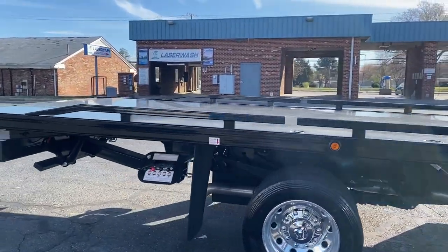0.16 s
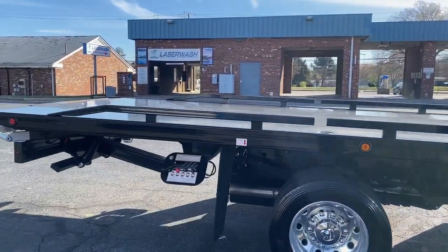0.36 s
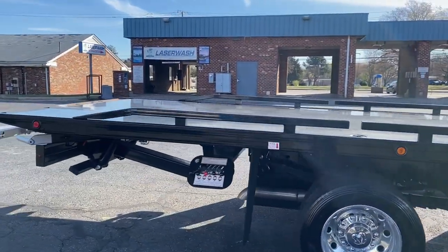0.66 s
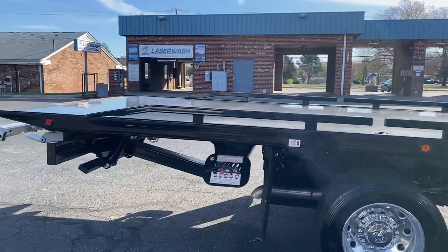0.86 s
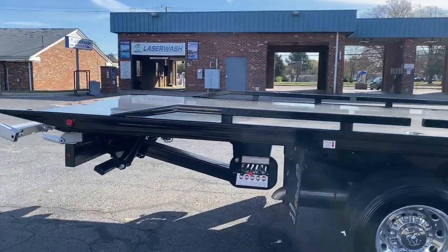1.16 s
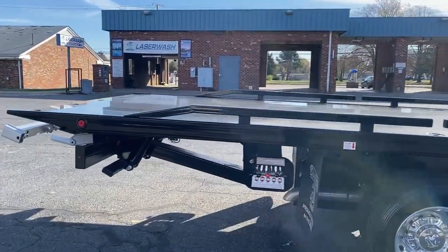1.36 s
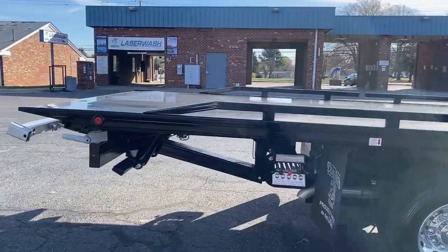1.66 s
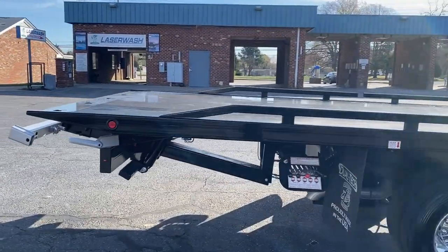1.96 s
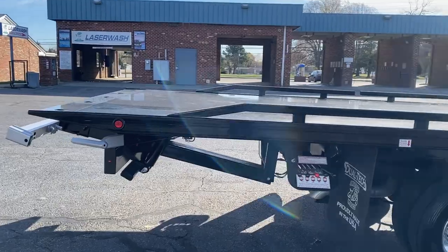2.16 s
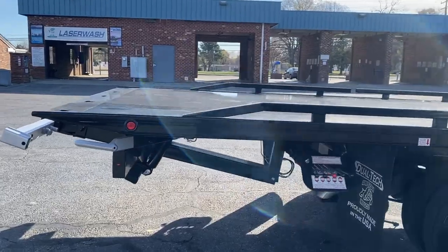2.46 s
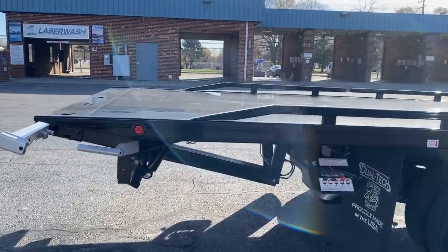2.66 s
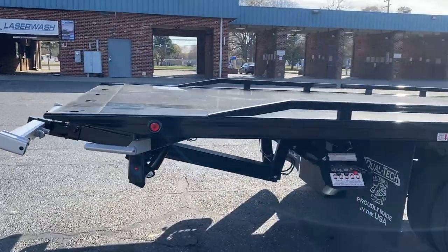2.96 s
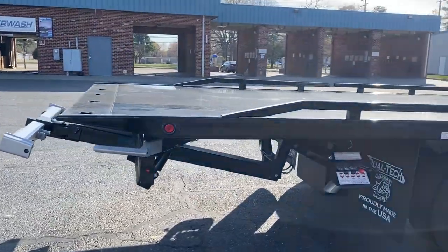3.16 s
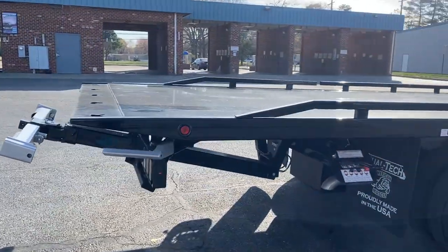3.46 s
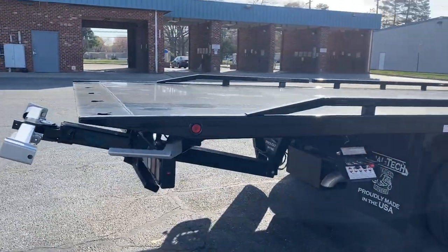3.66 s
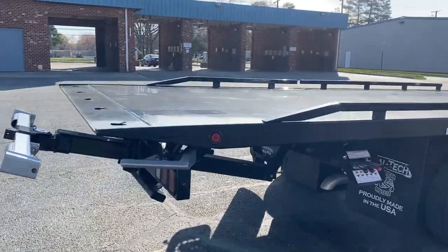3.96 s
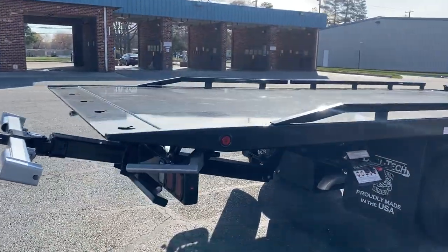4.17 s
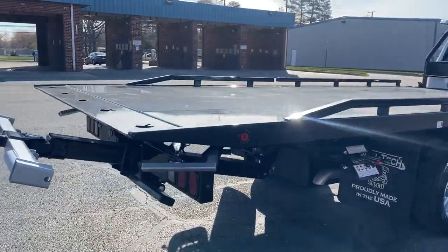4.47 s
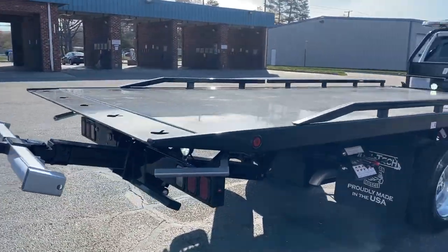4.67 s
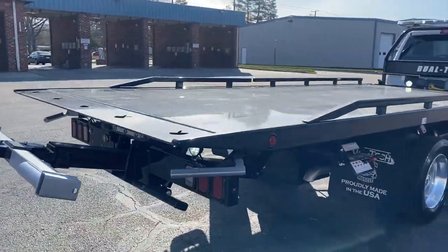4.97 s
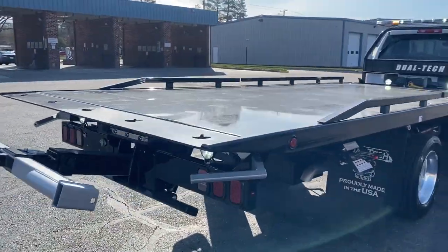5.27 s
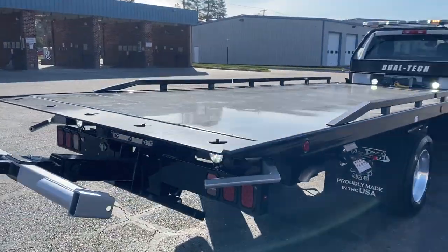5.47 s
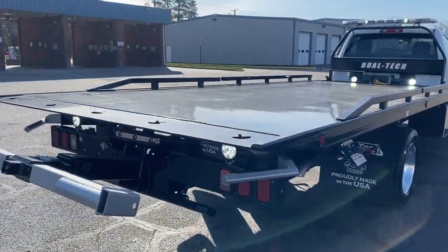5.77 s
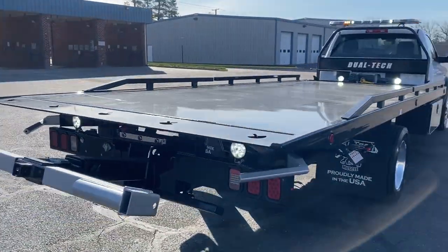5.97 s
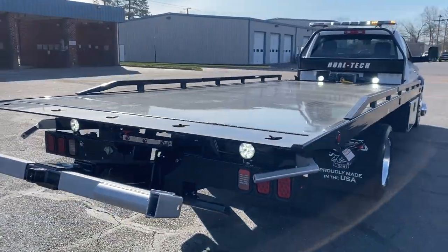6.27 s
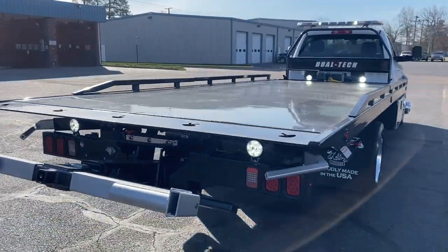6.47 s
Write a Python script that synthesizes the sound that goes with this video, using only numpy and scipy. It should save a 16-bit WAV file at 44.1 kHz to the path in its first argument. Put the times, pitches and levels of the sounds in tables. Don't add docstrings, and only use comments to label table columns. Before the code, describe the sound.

On an open paved lot, a handheld stereo microphone moves around an idling diesel truck. The engine hums low with fast, slightly uneven knocking, soft chuffs and thin whines. Wind thumps build midway, then hush as the hum is shaded at the rear corner. One tiny gritty click follows, and a fuller, duller exhaust drone returns with renewed gusts to the end.

```python
import sys
import numpy as np
from scipy import signal
from scipy.fft import rfft, irfft, next_fast_len
from scipy.io import wavfile
from scipy.ndimage import uniform_filter1d

SR = 44100
rng = np.random.default_rng(int(sys.argv[2]) if len(sys.argv) > 2 else 0)


def wav_record(signal):
    frames = np.transpose(np.atleast_2d(signal))
    bounded = np.clip(frames, -1, 1)
    quanta = np.round(bounded * 32767).astype(np.int16)
    wavfile.write(sys.argv[1], SR, quanta)


def convert_level_to_amplitude(level_db):
    exponent = np.asarray(level_db, float) / 20
    return 10 ** exponent


N = 291920
T = np.arange(N) / SR
PAD = next_fast_len(N)
HZ = np.fft.rfftfreq(PAD, 1 / SR)

CYCLE_HZ, FIRST_FIRING_S = 5.819, .051
CYCLES = CYCLE_HZ * (T - FIRST_FIRING_S)


def rms_one(x):
    return x / np.sqrt(np.mean(x ** 2) + 1e-20)


def in_time(rows):
    s, *columns = np.transpose(rows)
    return [np.interp(T, s, c) for c in columns]


def drift(rate_hz):
    r = np.exp(-80 * np.pi * rate_hz / SR)
    slow = signal.lfilter([1], [1, -2 * r, r * r], rng.standard_normal(N // 40 + 2002))[2000:]
    return np.interp(np.arange(N) / 40, np.arange(len(slow)), rms_one(slow - slow.mean()))


def band(x, low_hz, high_hz, order=2):
    return signal.sosfilt(signal.butter(order, [low_hz, high_hz], "band", fs=SR, output="sos"), x)


def swell(at_s, lift_db, half_s):
    return lift_db * np.exp(-((T - at_s) / half_s) ** 2)


def recede_db():
    return -3 * np.maximum(T - 4.46, 0)


# t/s, level/dB
GUST = [(0, -38.5), (.45, -38), (1, -36), (1.3, -36.5), (2.1, -36), (2.5, -35.5), (2.9, -31), (3.4, -31.5),
        (3.65, -35.5), (4.05, -55.5), (4.4, -41), (4.8, -36.5), (5.1, -33), (5.42, -34.5), (5.8, -33),
        (6.08, -30), (6.3, -38.5), (6.62, -30)]


def gust():
    gust_db, = in_time(GUST)
    return gust_db, gust_db + 36


# t/s, lift/dB, half length/s
HUSH = [
    (.2, 12, 0.73),
    (3.15, 12, 0.21),
    (4.1, -17, .2),
    (4.85, -22, 0.48),
]


def rumble():
    _, swing_db = gust()
    level_db = -46 + 0.96 * swing_db + sum(swell(*row) for row in HUSH)
    return convert_level_to_amplitude(level_db) * rms_one(band(rng.standard_normal(N), 36.8, 60.6, order=3))


def wind_levels():
    gust_db, swing_db = gust()
    lee_db = np.interp(T, [5.86, 6.27], [0, -9])
    return gust_db, -35 + 0.53 * swing_db + .4 * lee_db, -42 + 0.7 * swing_db + lee_db


def buffet(at_s, peak_db, hz):
    out = np.zeros(N)
    near = slice(int((at_s - .06) * SR), int((at_s + .06) * SR))
    age = T[near] - at_s
    out[near] = convert_level_to_amplitude(peak_db) * np.exp(-(age * hz / 1.08) ** 2) * np.cos(2 * np.pi * hz * age)
    return out


# t/s, peak/dB, f/Hz
BUFFETS = [(1.49, -25, 100), (1.998, -24, 140), (2.335, -21, 110), (2.47, -24, 70), (2.515, -20, 100),
           (2.652, -22, 70), (2.942, -19, 220), (2.982, -17, 85), (3.025, -20, 75), (3.068, -17, 70),
           (3.115, -21, 70), (3.188, -18, 110), (3.222, -21, 80), (3.255, -17, 75), (3.32, -17, 85),
           (3.432, -24, 130), (3.484, -17, 95), (3.62, -25, 150), (3.658, -23, 200), (3.742, -24, 260),
           (3.768, -22, 290), (4.72, -23, 180)]


def wind(lumpy_db=1.1):
    deep_db, upper_db, apart_db = wind_levels()
    white = rng.standard_normal((3, N))
    deep = rms_one(band(white[0], 54, 105, order=4) * convert_level_to_amplitude(lumpy_db * drift(9)))
    upper = rms_one(band(white[1], 105, 190, order=2) * convert_level_to_amplitude(lumpy_db * drift(12)))
    apart = rms_one(band(white[2], 55, 200, order=3) * convert_level_to_amplitude(lumpy_db * drift(1.8)))
    shared = convert_level_to_amplitude(deep_db) * deep + convert_level_to_amplitude(upper_db - 1) * upper
    shared += sum(buffet(*row) for row in BUFFETS)
    return shared + convert_level_to_amplitude(apart_db) * apart * np.array([[1], [-1]])


def struck(at_s, peak_db, hz, t60_s):
    age = np.maximum(T - at_s, 0)
    return convert_level_to_amplitude(peak_db - 60 * age / t60_s) * np.sin(2 * np.pi * hz * age)


# t/s, peak/dB
GRIT = [
    (4.2683, -32),
]
# f/Hz, level/dB, t60/s
GRIT_RINGS = [(2300, -5, .007), (4100, 0, .011), (5200, -8, .006), (8800, -13, .004), (11300, -7, .005),
              (14600, -5, .003)]


def grit():
    at_s, peak_db = GRIT[0]
    crack = sum(struck(at_s, peak_db + db, hz, t60_s) for hz, db, t60_s in GRIT_RINGS)
    return crack * convert_level_to_amplitude(np.array([[-3.5], [3.5]]))


WHINE_DB = [-70, -77.5, -71, -77]
# t/s, partial, lift/dB, half length/s
LOUD_SPOTS = [(0.603, 1, 10, 0.16), (1.955, 1, 15, 0.16), (4, 1, 3, 0.46), (4.802, 1, 7.5, 0.49),
              (6.1, 1, 12, 1), (.55, 2, 15, 0.57), (2.4, 2, 14, 0.23), (3.0, 2, 15, 0.47),
              (3.7, 2, 13, 0.27), (4.35, 2, 0, 0.11), (5.1, 2, 9, 0.14), (2.4, 3, 6, .2),
              (4.002, 3, 8.5, 0.5), (4.8, 3, 8.5, 0.32), (0.352, 4, 15, 0.19), (2.35, 4, 3, .15),
              (3.2, 4, 14, .2), (3.9, 4, 15, 0.15), (5.15, 4, 15, 0.18)]


def whine_levels():
    levels = []
    for partial, db in enumerate(WHINE_DB, 1):
        spots_db = sum(swell(s, lift, half) for s, k, lift, half in LOUD_SPOTS if round(k) == partial)
        levels.append(db + 1.1 * recede_db() + spots_db)
    return levels


# f/Hz, beside truck/dB, at corner/dB, past it/dB, behind/dB
HUMS = [(376, -52, -59, -66, -66), (489, -60, -52.5, -55, -56), (681, -62, -52.5, -50.5, -63),
        (716, -68, -63, -58, -64), (1744, -66, -65, -64, -68)]


def whine(flutter_db=2.2, whine_hz=1926.5):
    turn = 2 * np.pi * np.cumsum(whine_hz + 2.0 * drift(5.1)) / SR
    out = 0
    for partial, level_db in enumerate(whine_levels(), 1):
        out = out + convert_level_to_amplitude(level_db + 3 + flutter_db * drift(6)) * np.sin(partial * turn)
    throb = 1 + .45 * np.cos(6 * np.pi * CYCLES)
    for hz, *levels_db in HUMS:
        level_db = np.interp(T, [2.4, 3.4, 4.4, 5.1], levels_db) + 2.5 + 1.0 * drift(5)
        hum = np.sin(2 * np.pi * np.cumsum(hz + 2.3 * drift(3.5)) / SR)
        out = out + convert_level_to_amplitude(level_db) * throb * hum
    return out


def chuff(spread_db=1.0, place=.475, middle_hz=310, sweep_hz_per_s=8500, half_s=.015):
    cycles = CYCLES - place + .5
    age = (cycles % 1 - .5) / CYCLE_HZ
    each_db = spread_db * rng.standard_normal(int(cycles[-1]) + 2)[np.floor(cycles).astype(int) + 1]
    level_db = -36 + each_db + np.interp(T, [3.5, 3.9], [0, -10])
    sweep = np.cos(2 * np.pi * age * (middle_hz + sweep_hz_per_s * age / 2))
    return convert_level_to_amplitude(level_db) * np.exp(-(age / half_s) ** 2) * sweep


def by_cylinder(pattern_db):
    return convert_level_to_amplitude(np.array(pattern_db)[np.round(6 * CYCLES).astype(int) % 6])


CYLINDER_DB = [0, -2.5, 0, -1.5, -1.5, -3.5]


def knocks(spread_db=1.0):
    firing_hz = 6 * CYCLE_HZ
    at = (FIRST_FIRING_S * SR + np.arange(-1, firing_hz * N / SR - 2) * SR / firing_hz).astype(int)
    cylinder_db = np.array(CYLINDER_DB)[np.arange(-1, len(at) - 1) % 6]
    clicks = np.zeros(N)
    clicks[at] = convert_level_to_amplitude(cylinder_db + spread_db * rng.standard_normal(len(at)))
    return clicks


RING_BY_CYLINDER_DB = [0, -3, 1, -1, -5, -1]
UPPER_RING_BY_CYLINDER_DB = [0, -3, -4, -1, -1, -3]
# f/Hz, level/dB, t60/s
KNOCK_MODES = [(1060, -6, .025), (1255, -10, .02), (1420, 0, .022), (1520, -1, .018), (1980, -9, .02),
               (2550, -12.5, .012), (3230, -14, .012)]


def knock_ring(clicks):
    burn = .55 * np.roll(signal.lfilter(np.hanning(200), [1], clicks), 120)
    edge = 28 * np.roll(clicks, 190)
    lower, upper = by_cylinder(RING_BY_CYLINDER_DB), by_cylinder(UPPER_RING_BY_CYLINDER_DB)
    out = 0
    for hz, level_db, t60_s in KNOCK_MODES:
        r, w = convert_level_to_amplitude(-60 / (t60_s * SR)), 2 * np.pi * hz / SR
        mode = ([1, 0.013, -1.07], [1, -2 * r * np.cos(w), r * r])
        grain = rng.standard_normal(N)
        if hz < 1700:
            strike = lower * (edge + burn * grain)
        else:
            strike = upper * (edge / 12 + burn * grain)
        once = signal.lfilter(*mode, strike + 1e-18)
        out = out + convert_level_to_amplitude(level_db) * rms_one(signal.lfilter(*mode, once))
    return rms_one(out)


# f/Hz, share
SPECKLE_SHARE = [(1200, 0), (2400, 1), (6500, 1), (12000, 1.2)]


def speckle(x, depth_db=2.6, flicker_db=3.5):
    hz, _, cells = signal.stft(x, SR, nperseg=1024)

    def patches(bins, frames):
        field = uniform_filter1d(rng.standard_normal(cells.shape[1:]), size=bins, axis=0)
        return rms_one(uniform_filter1d(field, size=frames, axis=1))

    share = np.interp(hz, *np.transpose(SPECKLE_SHARE))[:, None]
    top_db = np.interp(hz, [13000, 14500], [0, flicker_db])[:, None]
    gain = convert_level_to_amplitude(depth_db * patches(2, 5) * share) * convert_level_to_amplitude(patches(8, 2) * top_db - 0.5)
    return signal.istft(cells * gain, SR, nperseg=1024)[1][:, :N]


def bed_shade_db(from_s, line_from_s, line_db, end_db):
    return np.where(T < from_s, 0, np.interp(T, [line_from_s, N / SR], [line_db, end_db]))


# t/s, knock lift/dB, half length/s
GAPS = [
    (0.02, 3, .3),
    (1.2, 3, .5),
    (2.6, 3.5, .8),
    (3.65, 6.5, .3),
    (4.5, 9, .6),
    (5.3, 7.5, .35),
    (6., 4, .5),
]


def block_levels():
    fade_db = -0.1941 * np.minimum(T, 4.46)
    gaps_db = sum(swell(*row) for row in GAPS)
    return (-34.5 + fade_db + bed_shade_db(3.8, 2.9, -19, -8),
            -34.5 + fade_db + bed_shade_db(4.5, 4, -4.5, -4),
            -29.5 + fade_db + 0.057 * gaps_db + 0.21 * recede_db(),
            -31.5 + fade_db + recede_db(),
            -61 + gaps_db + .5 * recede_db())


# f/Hz, spectrum level/dB
BLOCK_COLOUR = [(250, 12), (400, 10), (510, 6), (580, 1.5), (800, -2), (1450, -2.5), (1650, -7.5),
                (2600, -9.5), (3200, -11), (3700, -12), (7400, -17.5), (8200, -18), (11000, -24),
                (15500, -25.5)]
# f/Hz, width/Hz, lift/dB
PANELS = [(376, 30, 2), (489, 22, 4.5), (1060, 90, 4), (1420, 120, 0.5), (3200, 300, 4), (4380, 260, 2.5),
          (7500, 300, 3)]
CHUG_BY_CYLINDER_DB = [1, -14, 2, -1, 2, 0]
HIGH_CHUG_BY_CYLINDER_DB = [1, 1, 3, 1, -4, -2]


def block(patchy_db=0.16):
    colour_hz, colour_db = np.transpose(BLOCK_COLOUR)
    log_hz = np.log(HZ + 1)
    gain = convert_level_to_amplitude(np.interp(log_hz, np.log(colour_hz), colour_db))
    for hz, width_hz, lift_db in PANELS:
        gain *= 1 + (convert_level_to_amplitude(lift_db) - 1) / (1 + (2 * (HZ - hz) / width_hz) ** 2)
    noise = rfft(rng.standard_normal((2, N)), PAD) * gain
    drone_db, high_db, clatter_db, rattle_db, ring_db = block_levels()
    clicks = knocks()
    push = signal.fftconvolve(clicks, np.hanning(1100))[200:N + 200]
    chugs = []
    for pattern_db, lag_s in [(CHUG_BY_CYLINDER_DB, .014), (HIGH_CHUG_BY_CYLINDER_DB, .028)]:
        chug = signal.fftconvolve(clicks * by_cylinder(pattern_db), np.hanning(1100))[550:N + 550]
        chugs.append(np.roll(chug, int(lag_s * SR)))
    # level/dB, push
    centres = np.log([170, 280, 450, 750, 1300, 2200, 3500, 6000, 10000])
    parts = [(drone_db - 1, .9, chugs[0]), (high_db, .6, chugs[1]),
             (clatter_db, .15, push), (clatter_db, .25, push), (clatter_db, .25, push),
             (rattle_db, .22, push), (rattle_db, .18, push), (rattle_db, .1, push)]
    rush = 0
    for k, (level_db, depth, beat) in enumerate(parts, 1):
        region = np.interp(log_hz, centres, np.arange(len(centres)) == k)
        flicker = convert_level_to_amplitude(level_db + patchy_db * drift(21)) * (1 + depth * (beat - beat.mean()))
        rush = rush + irfft(noise * region, PAD)[:, :N] * flicker
    ring = convert_level_to_amplitude(ring_db + 3.2) * knock_ring(clicks)
    return speckle(rush) + np.array([ring, np.roll(ring, 61)])


# t/s, level/dB
EXHAUST = [(0, -32), (.7, -30.5), (1.5, -34), (2.4, -37.5), (3.45, -35), (3.62, -38), (3.78, -72),
           (3.92, -42.5), (4.2, -32), (4.7, -32.5), (5.3, -31.5), (5.65, -31), (6.0, -29), (6.3, -27),
           (6.62, -28.5)]
# t/s, share of the column behind the truck (0-1)
TAIL_SHARE = [
    (0, 0.55),
    (3.5, 0.01),
    (4.2, 0.83),
    (6.62, 1.),
]
# multiple of the cycle, beside truck/dB, behind
# it/dB
ORDERS_DB = [(6, -19, -35.1), (9, -12.9, -17.6), (12, -7.5, -10), (12.9, -13, -18.2), (15, -19.2, -21),
             (18, -7.8, -5.8), (21, -11, -13.5), (23.05, -6.0, -8.5), (24, -8.5, -6.5), (27, -7.5, -8.3),
             (30, -10.5, -7), (33, -22, -14), (36, -19, -22), (39, -18, -21), (42, -22, -24),
             (45, -20, -24), (48, -23, -30), (51, -28, -35.7)]


def exhaust(wander_db=1.4, pipe_lag_rad=.2, low_lag_rad=1.9, pipe_delay_s=.0033):
    (level_db,), (way,) = in_time(EXHAUST), in_time(TAIL_SHARE)
    turn = 2 * np.pi * (CYCLES - CYCLE_HZ * pipe_delay_s)
    out = 0
    for k, side_db, tail_db in ORDERS_DB:
        lag = pipe_lag_rad + low_lag_rad / (1 + (k / 15) ** 8)
        line_db = level_db + side_db + way * (tail_db - side_db) + wander_db * drift(1.2)
        out = out + convert_level_to_amplitude(line_db) * np.sqrt(2) * np.cos(k * turn - lag + .4 * drift(.5))
    return out


# f/Hz, likeness (0-1), left minus right/dB
PORTS = [(60, .97, .5), (200, .95, .5), (400, .75, .8), (800, .4, -1.), (1400, .7, -1.), (2250, .3, 3.5),
         (3600, .92, 4.5), (5600, .72, 4.), (6300, .998, 0), (16000, .998, 0)]
# f/Hz, right port's lead (half turns)
PORT_TURNS = [(0, 0), (690, .45), (1380, .6), (2840, -.25), (3620, 0), (7500, 0), (8350, 1), (9560, 1),
              (10400, 2), (11650, 2), (12500, 3), (13700, 3), (14600, 4), (22050, 4)]


def ports(direct, scattered):
    port_hz, alike, lean_db = np.transpose(PORTS)
    alike = np.clip(np.interp(HZ, port_hz, alike), 0, 1)
    lean = convert_level_to_amplitude(np.interp(HZ, port_hz, lean_db) / 2)
    shift = np.exp(1j * np.pi * np.interp(HZ, *np.transpose(PORT_TURNS)))
    left, other = rfft(direct, PAD), rfft(scattered, PAD)
    right = alike * shift * left + np.sqrt(1 - alike ** 2) * other
    return irfft(np.array([left * lean, right / lean]), PAD)[:, :N]


def scene():
    direct, scattered = block()
    tones = exhaust() + chuff() + whine()
    truck = ports(direct + tones, scattered + np.roll(tones, 300))
    return truck + wind() + rumble() + grit()


def band_limit(x):
    return signal.sosfilt(signal.butter(12, 16670, fs=SR, output="sos"), x)


def record(dry):
    cut = signal.sosfilt(signal.cheby2(14, 60, 16020, fs=SR, output="sos"), dry)
    return band_limit(cut)


dry = scene()
out = record(dry)
wav_record(out)
```